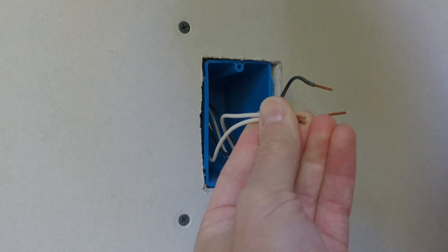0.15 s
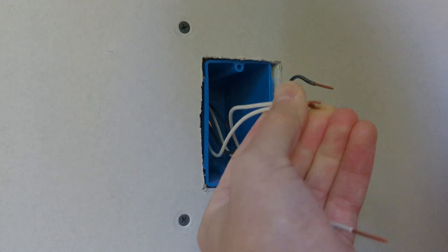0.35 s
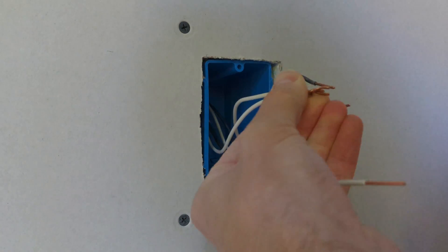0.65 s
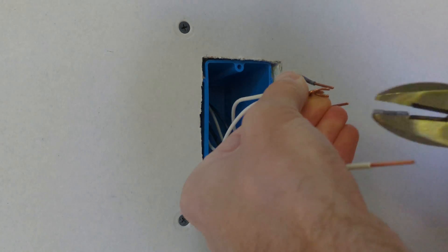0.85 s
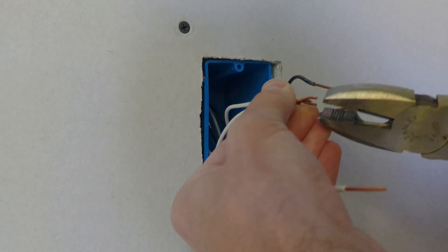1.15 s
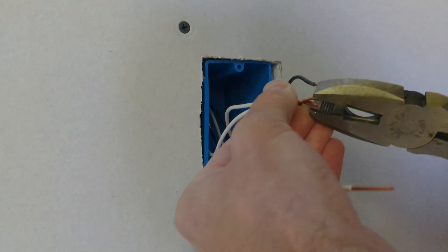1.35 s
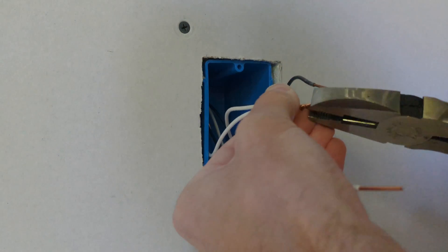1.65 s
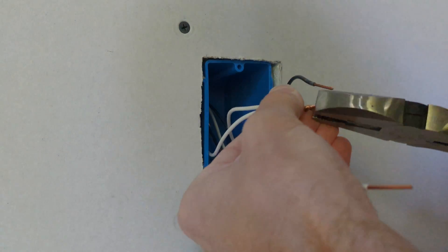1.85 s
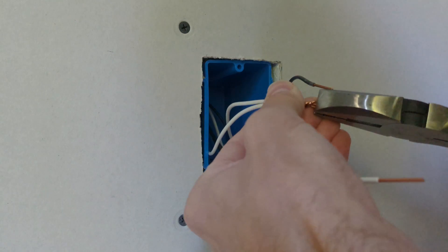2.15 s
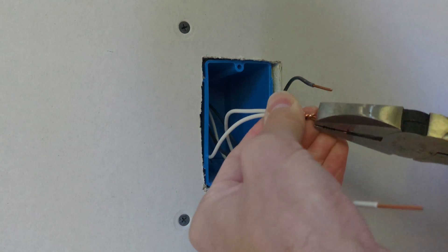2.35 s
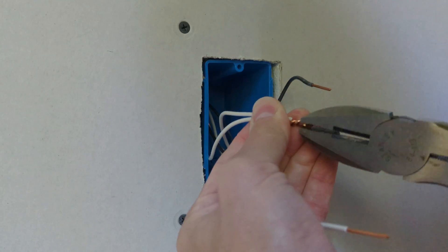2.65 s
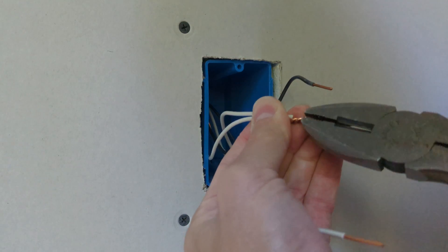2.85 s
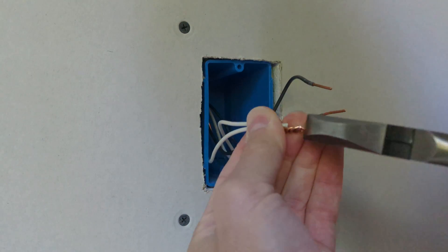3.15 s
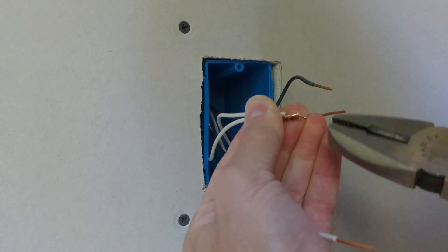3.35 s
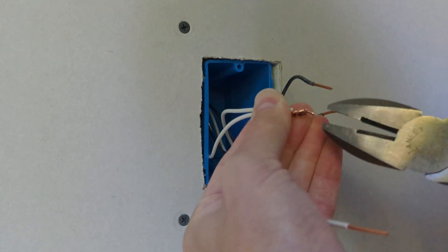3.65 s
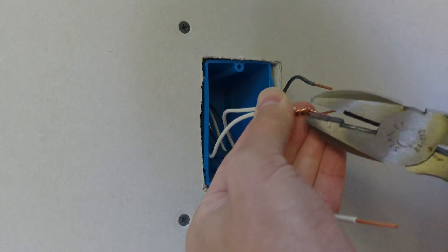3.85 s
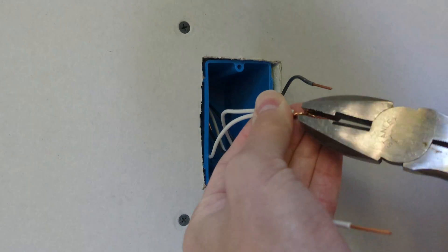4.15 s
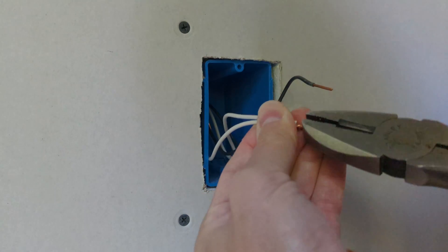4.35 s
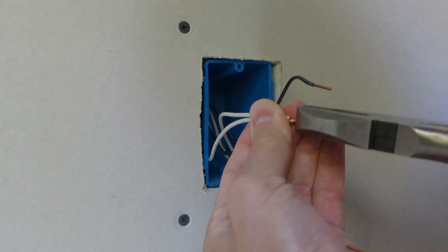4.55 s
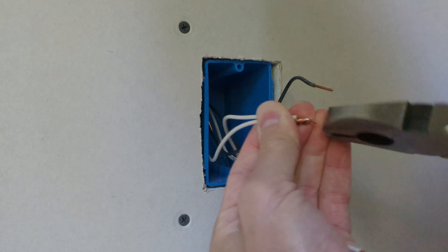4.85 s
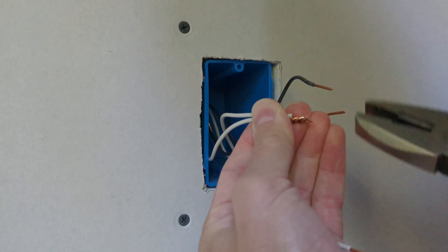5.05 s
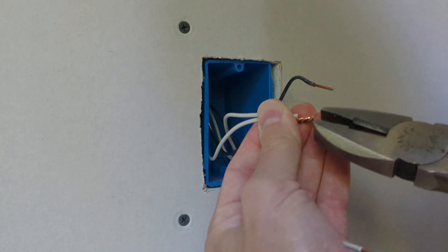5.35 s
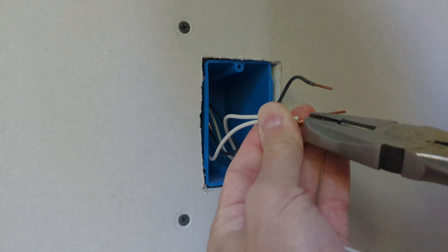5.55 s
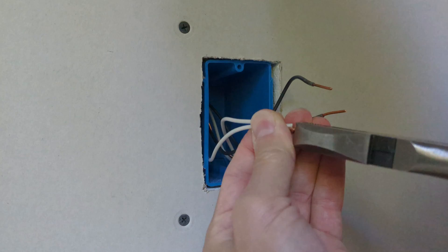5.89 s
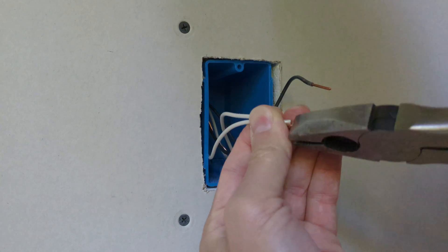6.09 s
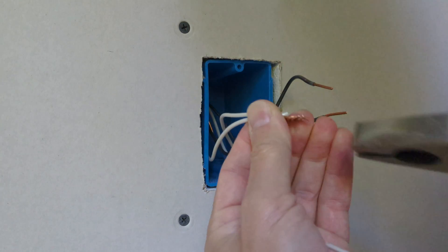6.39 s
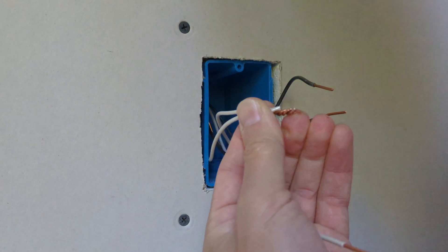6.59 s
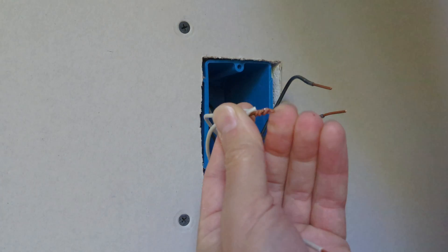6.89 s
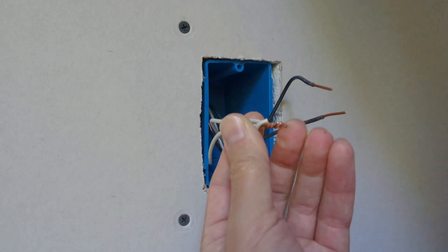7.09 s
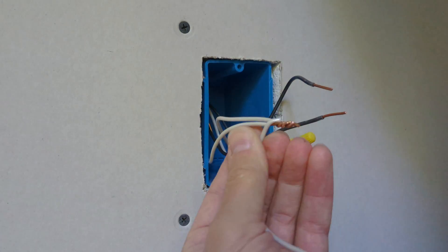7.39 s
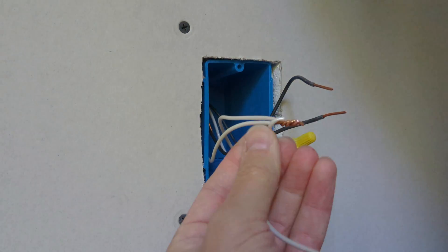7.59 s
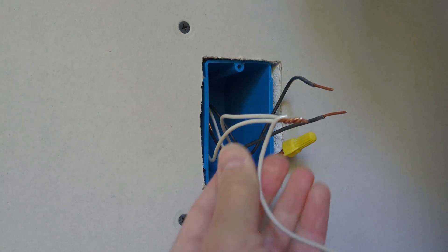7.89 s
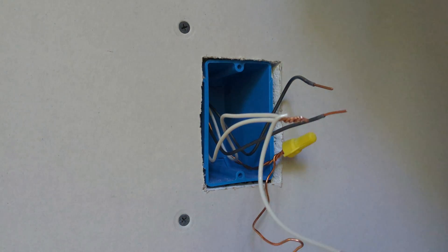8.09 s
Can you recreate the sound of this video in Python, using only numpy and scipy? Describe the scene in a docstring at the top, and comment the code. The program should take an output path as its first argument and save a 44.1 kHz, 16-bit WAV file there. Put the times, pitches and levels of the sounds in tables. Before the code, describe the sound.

Faint irregular clicks and short scrapes as pliers twist bare wires in a wall box, then two dull knocks with a steel jangle.

```python
"""A small bare room: steel pliers twist bare copper wires at a plastic wall box, close by.
Clicks and soft thumps mix the box's modes, a low push and a snap; scrapes are dense random stick-slip.
Taps ring the open jaws, tugs boom in the wall, and the hands rumble and creak over hiss and a thin whine.
At the end the pliers are put down: two dull knocks of boards, blow and scuff, the second with a
jangle of loose steel. Diffuse tails of noise give the room."""
import sys
import numpy as np
from scipy import signal
from scipy.fft import rfft, irfft, next_fast_len
from scipy.io import wavfile
from scipy.ndimage import uniform_filter1d

SR = 44100
rng = np.random.default_rng(int(sys.argv[2]) if len(sys.argv) > 2 else 0)


def wav_out(sig):
    """Save sig, one row per channel (or a flat mono array), as 16-bit PCM at SR to the path in sys.argv[1]."""
    wavfile.write(sys.argv[1], SR, np.round(np.clip(np.atleast_2d(sig).T, -1, 1) * 32767).astype(np.int16))


N = 362937
TAPS = 4096  # length of short responses [samples]


def gain_of(db):
    """Decibels to amplitude."""
    return 10 ** (np.asarray(db) / 20)


def evened(x):
    """Scales to rms 1."""
    return x / np.sqrt(np.mean(x ** 2) + 1e-20)


def struck(x, blow_s=0.01):
    """Scales a blow to rms 1 over its first moments."""
    first_moments = x[..., :round(blow_s * SR)]
    return x / np.sqrt(np.mean(first_moments ** 2) + 1e-20)


def read(points, hz):
    """Reads a table on a log-frequency axis."""
    f, value = np.transpose(points)
    return np.interp(np.log(hz + 1), np.log(f + 1), value)


def add(mix, s, sound):
    """Mixes a sound in at time s."""
    part = mix[:, max(0, round(s * SR)):][:, :sound.shape[-1]]
    part += sound[..., :part.shape[1]]


def convolve(a, b):
    """Convolves channel by channel."""
    return signal.fftconvolve(np.atleast_2d(a), np.atleast_2d(b), axes=1)


def pulse(colour, tilt_db=0):
    """The shortest causal pulse with a given spectrum: minimum phase, tilted in dB per octave."""
    hz = abs(np.fft.fftfreq(TAPS, 1 / SR))
    level_db = read(colour, hz) + tilt_db * np.log2(1 + hz / 300)
    log_gain = np.log(gain_of(level_db))
    return np.fft.ifft(np.exp(np.conj(signal.hilbert(log_gain)))).real


# how alike diffuse sound is at the two ports: (frequency [Hz], likeness [0-1])
PORT_LIKENESS = [(50, 0.9), (150, 0.8), (400, 0.49), (1000, 0.01), (4000, 0)]


def diffuse(size, colour):
    """Coloured noise at two ports, alike in the bass and unrelated in the treble."""
    padded = next_fast_len(size)
    hz = np.fft.rfftfreq(padded, 1 / SR)
    a, b = rfft(rng.standard_normal((2, padded)))
    same = np.clip(read(PORT_LIKENESS, hz), -1, 1)
    ports = np.array([a, same * a + np.sqrt(1 - same ** 2) * b])
    noise = irfft(ports * gain_of(read(colour, hz)), padded)
    return evened(noise[:, :size])


def ring(modes, detune, vary_db, pitch=1):
    """Dying modes; each blow lands on a new spot, and high modes reach the ports out of step."""
    t, out = np.arange(SR // 2) / SR, np.zeros((2, SR // 2))
    for k, (hz, db, t60) in enumerate(modes):
        shift, size, lag, side = rng.standard_normal(4)
        hz = hz * pitch * (1 + detune * shift)
        u = t[t < 1.5 * t60]
        ports = np.array([[1], [-1]]) * min(hz / 2500, 1)
        wave = np.sin(2 * np.pi * hz * u + ports * 0.9 * lag)
        level_db = db + vary_db * size + 1.4 * side * ports - 60 * u / t60
        out[:, :len(u)] += (-1) ** k * wave * gain_of(level_db)
    return struck(out)


def crack(decay_s):
    """A tiny burst of noise that dies exponentially."""
    t = np.arange(TAPS // 4) / SR
    return rng.standard_normal((2, len(t))) * np.exp(-t / decay_s)


# spectrum of a bright snap: (frequency [Hz], density [dB per Hz])
SNAP_COLOUR = [(500, -7), (1500, -8), (3000, -2.5), (5500, 6.5), (8000, 2.5), (11000, 0.5), (13300, 1.5),
               (14500, -5), (16000, 7)]


def snap(decay_s):
    """A bright burst: a crack shaped by the snap spectrum."""
    return struck(convolve(crack(decay_s), pulse(SNAP_COLOUR)))


# reverberation of the room: (frequency [Hz], t60 [s])
ROOM_DECAY = [(80, 0.43), (200, 0.27), (450, 0.43), (1000, 0.43), (3000, 0.46), (7000, 0.49), (15000, 0.24)]


def room(x, colour, build_s):
    """The diffuse tail alone: it builds up and dies band by band."""
    flat = [(20, 0), (20000, 0)]
    hz, t, z = signal.stft(diffuse(SR, flat), SR, nperseg=256)
    z *= gain_of(read(colour, hz)[:, None] - 60 * t / read(ROOM_DECAY, hz)[:, None])
    tail = signal.istft(z, SR, nperseg=256)[1]
    t = np.arange(tail.shape[1]) / SR
    build_up = 1 - np.exp(-(t / build_s) ** 2)
    return convolve(x, tail * build_up / np.sqrt(0.037 * SR))[:, :N]


# spectrum of still room and hiss: (frequency [Hz], density [dB per Hz])
AIR_COLOUR = [(15, -30), (25, -11.5), (68, 2), (102, -3.5), (335, -15), (695, -22), (818, -19), (1190, -18),
              (4030, -22.5), (4490, -22), (8830, -23.5), (14800, -29), (16000, -28)]
# steady electronic tones: (frequency [Hz], level [dB])
WHINE_TONES = [(2665, -102.5), (4495, -92.5), (8995, -99.5)]


def background(air_db=-68.5):
    """Still room and microphone hiss as steady noise, with a thin electronic whine of sines."""
    t = np.arange(N) / SR
    whine = sum(gain_of(db) * np.sqrt(2) * np.sin(2 * np.pi * hz * t) for hz, db in WHINE_TONES)
    return gain_of(air_db) * diffuse(N, AIR_COLOUR) + whine


# spectrum of the hands' rumble: (frequency [Hz], density [dB per Hz])
HANDS_COLOUR = [(25, 1), (50, -16), (80, 5.5), (140, -1.5), (250, -14.5), (450, -10.5), (900, -14.5),
                (3000, -30)]
# strain of the hands on the wires: (time [s], rumble level before trim [dB])
HAND_STRAIN = [(0.0, -66), (1.21, -73), (2.02, -68.5), (2.32, -59.5), (2.57, -66), (2.98, -67.5),
               (3.17, -60.5), (3.49, -74.5), (4.82, -65.5), (4.97, -60), (5.35, -73.5), (6.37, -63.5),
               (7.29, -67.5), (7.5, -59.5)]


def handling(trim_db=-1, lumpy_db=1.5, creak_db=-3, creaks_per_s=9):
    """Hands strain on the wires: an uneven low rumble, and stray creaks that grow with the strain."""
    s, db = np.transpose(HAND_STRAIN)
    strain = gain_of(trim_db + np.interp(np.arange(N) / SR, s, db))
    knots = np.arange(0, N, SR // 20)  # a new random level 20 times a second
    lumps = gain_of(lumpy_db * np.interp(np.arange(N), knots, rng.standard_normal(len(knots))))
    slips = rng.uniform(-0.97, 1, N) * (rng.random(N) < creaks_per_s / SR)
    creaks = convolve(slips * strain, box(tilt_db=7))[:, :N]
    return strain * lumps * diffuse(N, HANDS_COLOUR) + gain_of(creak_db) * creaks


def hardness(db, hardest_db=2.5, neutral_db=-58, span_db=7):
    """Treble tilt in dB per octave: weak contacts are dull, strong ones bright."""
    return hardest_db * np.tanh((db - neutral_db) / span_db)


# modes of wires, jaws and box together: (centre frequency [Hz], level before tilt [dB], t60 [s])
BOX_MODES = [(696, -5.5, 0.063), (934, 0, 0.033), (1030, 4.5, 0.014), (1186, -2.5, 0.02),
             (1456, -9.5, 0.024), (1750, -2.5, 0.009), (2330, -5, 0.03), (2790, -6, 0.015),
             (3396, -10, 0.011), (4820, -9.5, 0.0045)]
# spectrum of the dry clack under the modes, before tilt: (frequency [Hz], density [dB per Hz])
CLACK_COLOUR = [(150, -17.5), (400, 5.5), (700, -7.5), (1300, -0.5), (2000, -8), (3000, -12), (3700, -20),
                (4500, -31.5), (8000, -29), (16000, -77)]


def box(tilt_db, clack_db=-3):
    """The box's answer to one blow: a few modes over a dry clack; a harder contact reaches higher."""
    lowest_hz = BOX_MODES[0][0]
    modes = [(hz, db + tilt_db * np.log2(hz / lowest_hz), t60) for hz, db, t60 in BOX_MODES]
    rung = ring(modes, detune=0.012, vary_db=1.5)[:, :TAPS]
    clack = struck(convolve(crack(0.0027), pulse(CLACK_COLOUR, tilt_db)))[:, :TAPS]
    return struck(rung + gain_of(clack_db) * clack)


def chatter(tilt_db, after_db=-10, spread_s=0.016, count=4):
    """A contact and its small after-contacts; a soft one chatters more than a clean, hard one."""
    contacts = np.zeros(TAPS)
    contacts[0] = 1
    at = np.minimum(rng.uniform(0.1967, 1, count) * spread_s * SR, TAPS - 1).astype(int)
    contacts[at] += gain_of(after_db - 2 * tilt_db) * rng.standard_normal(count)
    return contacts


# clicks of jaws and wires, with a few soft thumps of a finger or knuckle:
# (time [s], ring of the box [dB], low push [dB], bright snap [dB])
CLICKS_AND_THUMPS = [(0.0514, -52, -87, -70), (0.1027, -65, -60, -70), (0.5972, -59, -78, -65),
                     (0.651, -57.5, -63, -70), (0.7187, -55.5, -71, -62), (1.345, -63.5, -74, -66),
                     (1.4958, -67, -85, -85), (1.5453, -66.5, -68, -65.5), (2.0294, -48.5, -76, -66),
                     (2.084, -61, -71, -65), (2.1258, -58, -79, -64), (3.0483, -28, -34, -33.5),
                     (3.2529, -54.5, -74, -64), (3.9232, -58.5, -70, -60), (4.0931, -64.5, -72, -80),
                     (4.1525, -51, -78, -68), (4.158, -57, -51.5, -50.5), (4.5659, -67, -64, -62),
                     (4.724, -71, -58.5, -62.5), (4.8212, -64, -59.5, -60), (4.9199, -38.5, -52.5, -55),
                     (4.9303, -45.5, -49.5, -55), (4.9791, -42.5, -65, -61), (5.5765, -66, -76, -58.5),
                     (5.693, -71, -75, -63), (5.9305, -48, -72, -73), (6.0826, -57, -58, -79),
                     (6.1577, -43.5, -49, -54.5), (6.3868, -42.5, -46, -62), (6.6335, -63, -66, -65),
                     (6.6476, -54, -76, -57), (6.6781, -53, -68, -74), (6.7364, -67, -73, -63.5),
                     (6.8536, -66.5, -62, -75), (7.6084, -76, -75, -58.5), (7.6234, -49.5, -75, -79),
                     (8.081, -57.5, -72, -60)]
# spectrum of the low push: (frequency [Hz], density [dB per Hz])
PUSH_COLOUR = [(20, -48), (45, -7.5), (80, -11.5), (160, -1.5), (330, 2), (550, -3), (1000, -37),
               (4000, -54)]


def clicks():
    """Each click or thump mixes a chattering ring of the box, a low push and a bright snap."""
    out, push = np.zeros((2, N)), struck(pulse(PUSH_COLOUR))
    for s, ring_db, push_db, snap_db in CLICKS_AND_THUMPS:
        tilt_db = hardness(ring_db)
        add(out, s, gain_of(ring_db) * convolve(box(tilt_db), chatter(tilt_db)))
        add(out, s, gain_of(push_db) * push)
        add(out, s, gain_of(snap_db) * snap(decay_s=0.0022))
    return out


def groan(force, hz=715, wander=0.097):
    """Slips lock loosely to the lowest mode of the box, which rings on."""
    drift = evened(uniform_filter1d(rng.standard_normal(len(force)), size=130))
    phase = 2 * np.pi * np.cumsum(hz * (1 + wander * drift)) / SR
    rung = convolve(np.sin(phase) * force, ring(BOX_MODES[:1], detune=0, vary_db=0)[:, :TAPS])
    return np.sqrt(2) * rung / abs(rung).max()


def stick_slip(shape, per_s):
    """Sparse random impulses at an average rate, scaled to rms 1."""
    return evened(rng.standard_normal(shape) * (rng.random(shape) < per_s / SR))


# wire dragged over steel or skin: (start [s], length [s], ring of the box [dB], fizz [dB])
DRAGS = [(0.639, 0.07, -56.5, -69), (1.84, 0.18, -68, -73), (2.326, .12, -56.5, -64.5),
         (3.236, .035, -60, -66), (4.827, 0.12, -75, -62.5), (4.906, 0.057, -50, -74),
         (5.619, 0.14, -70, -75), (6.355, .06, -42.5, -44.5), (6.628, 0.051, -60, -77),
         (6.824, .14, -72.5, -65), (7.32, .2, -67.5, -60.5)]
# spectrum of the fine fizz: (frequency [Hz], density [dB per Hz])
FIZZ_COLOUR = [(500, -7), (2000, 0), (5000, 3.5), (8000, 6), (11000, 0), (16000, 6.5)]


def scrapes(slips_per_s=800, grains_per_s=4000, rise_share=0.15, groan_at_db=-45, groan_growth=1.67):
    """Dense uneven stick-slip shakes the box, makes it groan and sheds a fine fizz."""
    out = np.zeros((2, N))
    for start, length, ring_db, fizz_db in DRAGS:
        t = np.arange(0, length, 1 / SR)
        force = np.interp(t / length, [0, rise_share, 1], [0, 1, 0])
        slips = stick_slip(len(t), slips_per_s) * force
        grains = stick_slip((2, len(t)), grains_per_s) * force
        shaken = box(hardness(ring_db))
        fizz = pulse(FIZZ_COLOUR)[None]
        for db, drive, response in (ring_db, slips, shaken), (fizz_db, grains, fizz):
            add(out, start, gain_of(db) * convolve(drive, response / np.linalg.norm(response[0])))
        # the groan equals the ring at groan_at_db and grows faster than it [dB per dB]
        groan_db = groan_at_db + groan_growth * (ring_db - groan_at_db)
        add(out, start, gain_of(groan_db) * groan(force))
    return out


# tugs on the wires that make the hollow wall boom: (time [s], level [dB])
WIRE_TUGS = [(0.659, -54), (1.545, -62), (2.089, -56), (3.052, -55), (3.935, -60), (4.921, -47.5),
             (6.375, -46.5)]
# spectrum of the wall's boom: (frequency [Hz], density [dB per Hz])
WALL_COLOUR = [(25, -28), (50, -5), (75, 8.5), (115, -0.5), (160, 10.5), (230, -5), (350, -9.5), (550, -30),
               (2000, -77)]


def tugs(rise_s=0.0052, decay_s=0.053):
    """The wallboard takes up each tug slowly and booms: low noise that swells and dies."""
    out, t = np.zeros((2, N)), np.arange(SR // 2) / SR
    swell = (1 - np.exp(-t / rise_s)) * np.exp(-t / decay_s)
    for s, db in WIRE_TUGS:
        add(out, s, gain_of(db) * swell / swell.max() * diffuse(len(t), WALL_COLOUR))
    return out


# open jaws tapping a wire end: (time [s], level [dB], pitch of the jaws [Hz])
JAW_TAPS = [(0.798, -59, 2790), (1.168, -67, 2720), (3.639, -49.5, 2795), (5.19, -49, 2740)]
# modes of the open jaws: (multiple of their pitch [ratio], centre level [dB], t60 [s])
JAW_MODES = [(.74, -8, .008), (1, 0, .017), (1.002, -29, .3), (1.16, -6, .01), (1.87, -7, .018),
             (2.25, -42, .3)]


def pings(bounce_s=0.00188, tick_db=-12, contact_s=0.00035):
    """Light taps leave the open jaws ringing faintly; the wire springs back with a tick."""
    out, onset = np.zeros((2, N)), 1 - np.exp(-np.arange(SR // 2) / SR / contact_s)
    for s, db, hz in JAW_TAPS:
        add(out, s, gain_of(db) * struck(onset * ring(JAW_MODES, detune=0, vary_db=3.0, pitch=hz)))
        add(out, s + bounce_s, gain_of(db + tick_db) * box(tilt_db=6))
    return out


def contact(rock_hz=270, rock_s=0.0018, share=0.047):
    """One push, swelling into a few quick rocking cycles of the handles."""
    t = np.arange(TAPS) / SR
    swell = t / rock_s * np.exp(1 - t / rock_s)
    return (t == 0) - share * np.sin(2 * np.pi * rock_hz * t) * swell


# pliers landing: (time [s], level before layer trims [dB], treble tilt of the blow [dB per octave])
LANDINGS = [(7.5481, -18.5, 5.5), (7.8121, -15, -8.5), (7.8223, -19, -9.5), (7.846, -29, 2.5),
            (7.870, -23, -0.5), (7.884, -26, 7)]
# spectrum of blow and scuff, before the blow's tilt: (frequency [Hz], density [dB per Hz])
BLOW_COLOUR = [(15, -62), (35, -32), (70, -21), (125, -1.5), (300, 2), (450, -1.5), (640, -5), (950, -21),
               (1800, -27.5), (2500, -35.5), (6000, -56), (16000, -73)]
# modes of the boards that the pliers land on: (centre frequency [Hz], centre level [dB], t60 [s])
BOARD_MODES = [(64, -23, 0.21), (114, -1.5, 0.16), (155.5, -10, 0.24), (176.8, 1.5, 0.25),
               (220.1, -4, 0.26), (299, -2.5, 0.2), (386, -5.5, 0.064), (432, -16.5, 0.22),
               (453, -3, 0.038), (538, -11.5, 0.18), (666, -22.5, 0.25), (821.5, -23.5, 0.18)]


def knocks(blow_db=-2.5, boards_db=-7, scuff_db=-9, scuff_s=0.014):
    """Padded handles land and bounce: a dull blow, a rough scuff and the boom of the boards."""
    out, t = np.zeros((2, N)), np.arange(TAPS) / SR
    scuff_swell = t / scuff_s * np.exp(1 - t / scuff_s)
    for s, db, tilt_db in LANDINGS:
        add(out, s, gain_of(db + blow_db) * struck(convolve(pulse(BLOW_COLOUR, tilt_db), contact())))
        add(out, s, gain_of(db + scuff_db) * diffuse(TAPS, BLOW_COLOUR) * scuff_swell)
        add(out, s, gain_of(db + boards_db) * ring(BOARD_MODES, detune=0.012, vary_db=4.5))
    return out


# the loose joint rattling as the pliers land: (time [s], level before layer trims [dB])
RATTLES = [(7.8122, -56), (7.8227, -37.5), (7.8252, -37), (7.8507, -37.5), (7.856, -46), (7.887, -46.5),
           (7.912, -52.5)]
# modes of the whole pliers: (centre frequency [Hz], centre level [dB], t60 [s])
STEEL_MODES = [(1790, -31, 0.055), (2723, 3.5, 0.063), (2820, -2, 0.023), (5030, -3, 0.051),
               (5110, 0, 0.041), (4970, 5, 0.04), (5400, 2.5, 0.026), (6500, -22, 0.022),
               (7470, 4.5, 0.019), (7800, 1, 0.017), (8600, 2, 0.024), (10430, 2, 0.012)]


def jangles(ring_db=-2, clash_db=-1, clash_s=0.0038):
    """Steel hits steel in the joint: a bright clash and the chattering ring of the tool."""
    out = np.zeros((2, N))
    for s, db in RATTLES:
        steel = ring(STEEL_MODES, detune=0.0094, vary_db=1.0)
        rattle = chatter(0, after_db=-12, spread_s=0.02)
        add(out, s, gain_of(db + ring_db) * convolve(steel, rattle))
        add(out, s, gain_of(db + clash_db) * snap(clash_s))
    return out


def scene(wall_s=0.001512, wall_db=-8, ping_wet_db=-7, port_lag=3):
    """The work at the box is near and fairly dry; the landing is farther off and full of room."""
    # room colours: (frequency [Hz], level [dB])
    near_colour = [(60, 11.5), (150, -14.0), (450, 2.0), (800, -7.5), (2300, -8.0),
                   (3300, -2.5), (4300, -5.5), (7000, -9), (15000, -4)]
    far_colour = [(60, -4), (200, -20), (500, 4.5), (1200, 2.0), (5000, 0.0), (15000, -4)]
    work, taps, landing = clicks() + scrapes(), pings(), knocks() + jangles()
    near = work + taps
    add(near, wall_s, gain_of(wall_db) * work)  # the wall throws clicks and scrapes straight back
    near[1] = np.roll(near[1], port_lag)  # in samples: the left port hears the box first
    near += room(work + gain_of(ping_wet_db) * taps, near_colour, build_s=0.0039)
    far = landing + room(landing, far_colour, build_s=0.004)
    return near + far + tugs() + handling() + background()


def record(dry, low_cut_hz=48, order=3, edge_hz=16000):
    """The microphone's bass roll-off and a steep upper band limit."""
    bass_cut = signal.butter(order, low_cut_hz, "highpass", fs=SR, output="sos")
    heard = signal.sosfilt(bass_cut, dry)
    band_limit = signal.firwin(511, edge_hz, window=("kaiser", 9), fs=SR)
    return signal.oaconvolve(heard, band_limit[None], "same")


dry = scene()
out = record(dry)
wav_out(out)
```